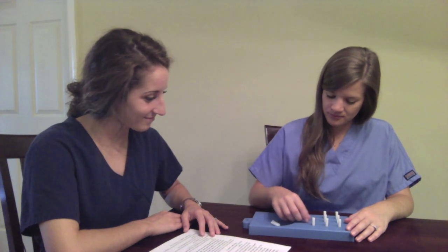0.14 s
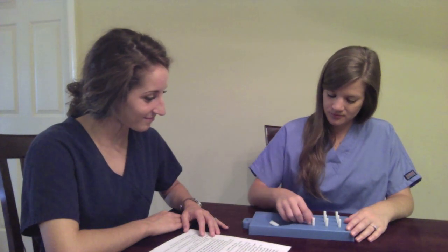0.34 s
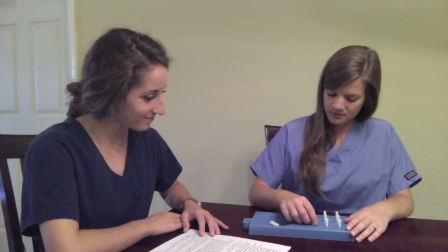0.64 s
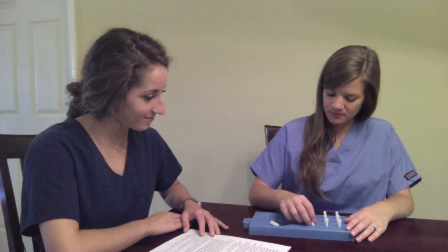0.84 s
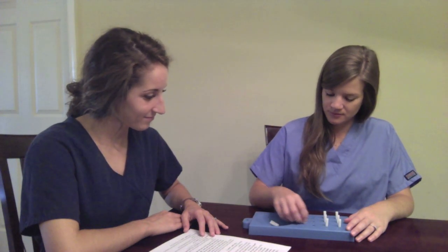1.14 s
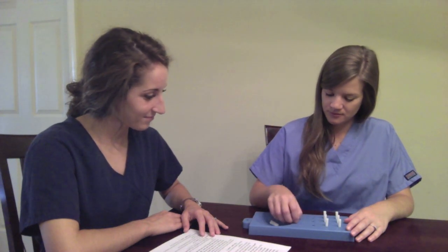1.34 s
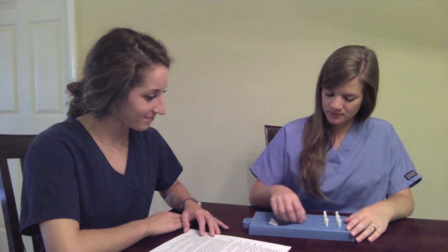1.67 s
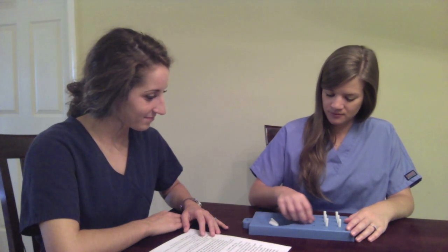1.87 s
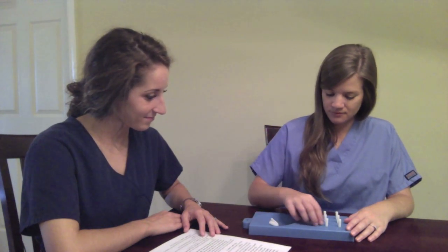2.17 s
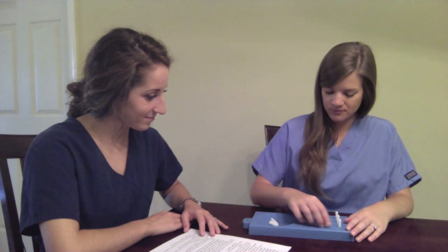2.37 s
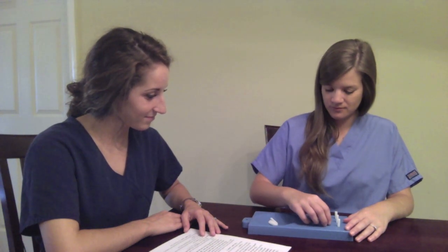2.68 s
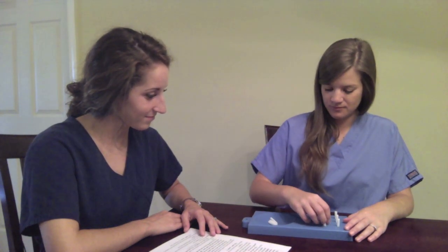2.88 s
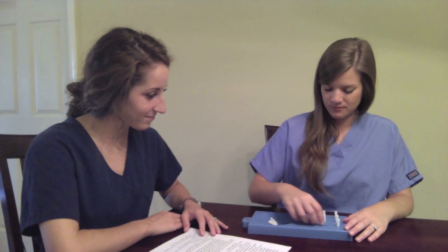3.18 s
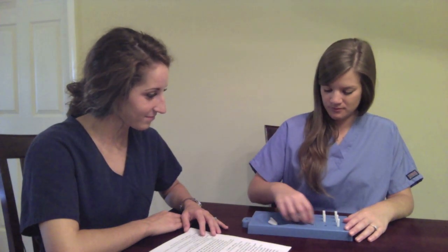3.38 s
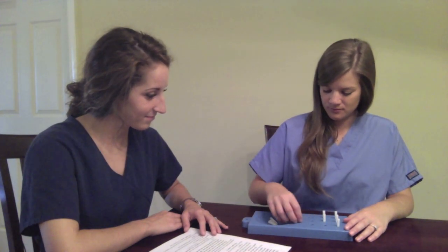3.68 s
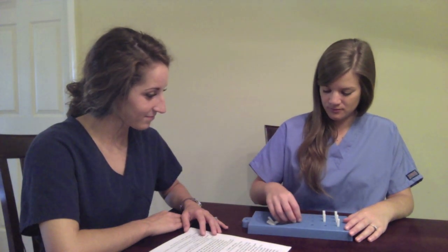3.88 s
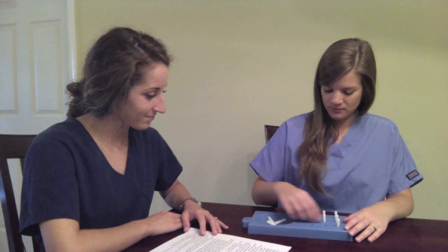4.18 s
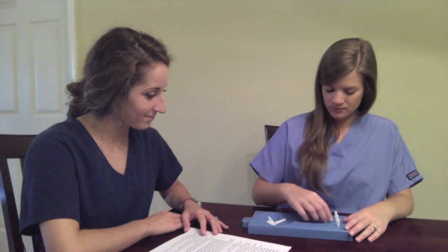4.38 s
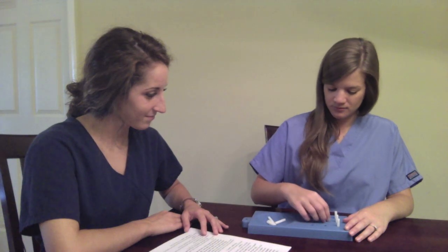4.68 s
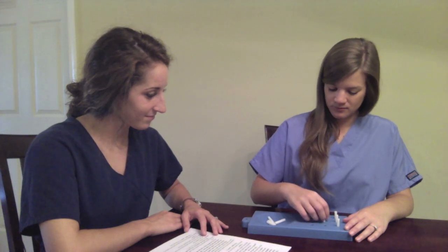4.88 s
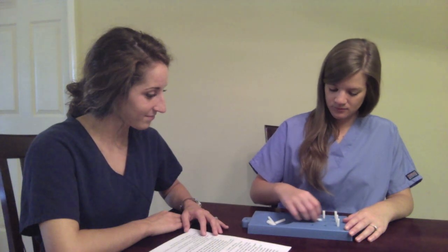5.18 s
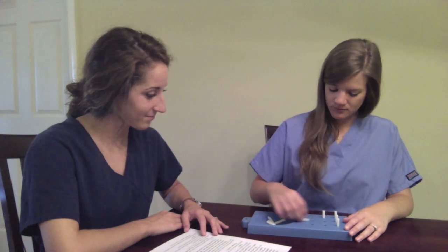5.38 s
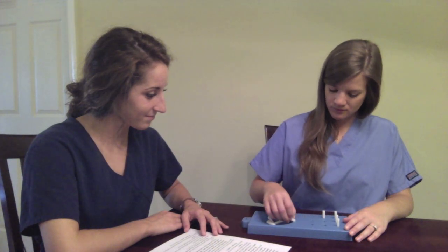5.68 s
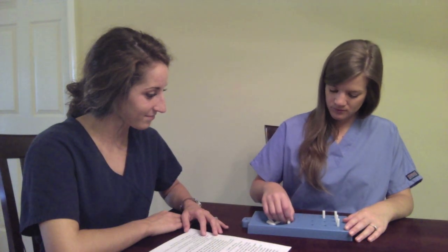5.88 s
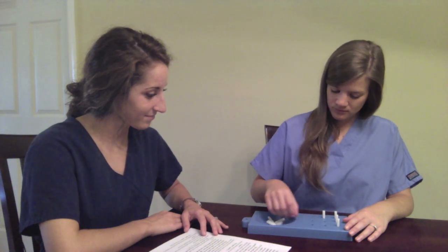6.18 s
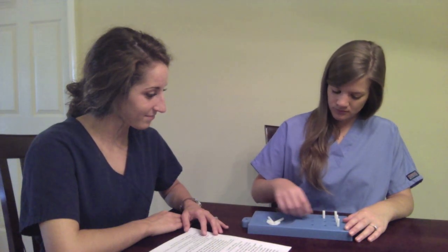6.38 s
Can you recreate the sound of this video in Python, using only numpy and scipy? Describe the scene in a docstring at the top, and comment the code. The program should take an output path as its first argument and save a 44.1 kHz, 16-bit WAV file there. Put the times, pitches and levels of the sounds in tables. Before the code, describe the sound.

Quiet indoor air with fingers softly bumping a plastic board. A peg clicks, then clatters into a hollow tray; light ticks follow, and another peg lands with a harder, fuller rattle. A low soft thump, a pause, a short gritty scrape of pegs over plastic, then two quieter drops with brief chatter. Dry, close-sounding clicks with a short room tail, in mono, from a microphone about a table's distance away.

```python
"""Small plastic pegs are pulled from a pegboard and dropped into its hollow tray, in a quiet room.
Some chatter, loose in the tray or wiggled in a hole; fingers tick pegs, bump the board and drag pegs.
Each contact is a blow of noise and echoes, filtered by the resonances of board and peg.
Drags are random stick-slip clicks through the tray; the room tone is shaped noise."""
import sys
import numpy as np
from scipy import signal
from scipy.fft import rfft, irfft
from scipy.io import wavfile

SR = 44100
rng = np.random.default_rng(int(sys.argv[2]) if len(sys.argv) > 2 else 0)


def int16_out(signal):
    """Quantize to a 16-bit WAV file."""
    q = np.round(np.clip(np.atleast_2d(signal).T, -1, 1) * 32767)
    wavfile.write(sys.argv[1], SR, q.astype(np.int16))


N = 287954

# Parts of a contact's sound: thud, shell, clack, click, fizz. Each row: low edge in Hz, high edge in Hz.
PARTS_HZ = [(250, 500), (600, 2000), (2200, 5000), (5500, 8000), (9500, 15000)]
# Soft finger bumps on the board. Each row: start in seconds, level in dB, hardness as a corner in Hz.
BUMPS = [(0.249, -56.5, 382), (0.424, -65, 1390), (0.458, -59.5, 1510), (0.744, -62, 800),
         (2.85, -63.5, 900), (3.219, -58, 900), (4.134, -46, 363), (4.17, -48, 348), (4.206, -56, 372),
         (4.496, -61, 447), (4.538, -64, 793), (6.444, -53.5, 400)]
# Broad colour of a knock. Each row: frequency in Hz, relative level in dB per Hz.
KNOCK_COLOUR = [(30, -46), (70, -33), (150, -26.5), (240, -19.5), (320, -3.5), (470, -7), (700, -4),
                (1400, -6), (2000, -7.5), (2600, -5), (3600, -1), (5000, -9.5), (7500, -17), (8600, -23),
                (11000, -16), (16000, -26.5)]
# Broad colour of a scrape. Each row: frequency in Hz, relative level in dB per Hz.
SCRAPE_COLOUR = [(40, -26), (200, -18), (330, -5), (480, -6), (700, -3), (1800, 7.5), (2600, -6.5),
                 (4200, -4.5), (5200, -27), (9000, -35), (16000, -43)]
# Resonances of the board and tray, plus the long narrow ring of a peg still ringing near 3.4 kHz. Each row:
# frequency in Hz, width in Hz, lift in dB.
BOARD_AND_PEG_MODES = [(301, 24, 8.5), (389, 34, 9), (584, 19, 10), (720, 13, 5.5), (820, 70, 3), (994, 59, 5.5),
                       (1327.4, 30, 9), (1713, 64, 5.5), (2133, 17, 9.5), (2390, 8.3, 7), (2486, 35, 9.5),
                       (2616, 50, 7), (2720, 45, 4.5), (2800, 21, 6.5), (2997, 63, 5.5), (3130, 32, 2),
                       (3370, 13, 9.5), (3413, 6.4, 7), (3450, 12, 4), (3620, 25, 4), (3970, 40, 5.5),
                       (4610, 39, 9.5), (5796, 150, 5)]
# Room decay. Each row: frequency in Hz, time to fall 60 dB in seconds.
ROOM_T60 = [(100, .45), (330, 0.31), (700, 0.21), (1700, 0.29), (3400, 0.25), (6000, 0.28), (12000, 0.17),
            (16000, 0.21)]
# Colour of the room tone. Each row: frequency in Hz, relative level in dB per Hz.
AIR_COLOUR = [(15, -69), (25, -40.5), (48, -11.5), (166, -7.5), (242, -4), (277, -4), (384, -4.5),
              (439, -8.5), (695, -3), (775, -8.5), (2280, -8.5), (2840, -19), (3520, -16), (4870, -25),
              (16000, -32)]
# Drift of the room tone. Each row: time in seconds, level in dB before the overall gain.
AIR_DRIFT = [(0, -65), (.4, -69), (.9, -68.5), (1.6, -62.5), (2.2, -66.5), (3.4, -68), (4, -64.5),
             (4.75, -70.5), (5.151, -71), (5.7, -65.5), (6.53, -65.5)]
# Light touches on a held peg. Each row: start in seconds, lower mode in Hz, its level in dB,
# upper mode's level in dB relative to the lower.
PINGS = [(.47, 2070, -60, -22), (0.5255, 2150, -54.5, 3), (0.9405, 2670, -52.5, -28),
         (1.097, 2420, -53.5, -7), (1.158, 2654, -53, -16), (1.8554, 2220, -44.5, -12),
         (2.24, 2820, -45, -10.5), (2.3755, 2800, -53, -4.5), (2.438, 2940, -61.5, -11),
         (3.077, 2550, -61.5, -16.5), (3.22, 1670, -56.5, -22), (3.229, 1795, -52.5, -24),
         (3.4915, 2420, -45.5, 1), (4.537, 2440, -61.5, -9.5), (5.193, 2620, -57.5, -5),
         (5.458, 3740, -59.5, -0.5), (5.56, 2390, -53, -5), (6.0921, 2570, -51, -7)]
# Pegs striking board or peg. Each row: start in seconds, peg pitch in Hz, clack level in dB,
# board's share in dB relative to the clack, sharp edge's share likewise.
STRIKES = [(0.524, 2350, -50.5, -9.5, -18.5), (0.981, 2320, -31, -3.5, -7.5), (1.158, 2620, -50.5, -3, -33),
           (1.312, 3240, -25.5, -4, -8.5), (1.321, 2580, -32, -5.5, -9), (1.361, 2670, -31, -1, -14),
           (1.394, 3300, -32, -7, -11.5), (1.423, 2670, -36, -1, -11), (1.445, 3400, -28, -13, -10),
           (1.476, 2770, -37, -5.5, -12.5), (1.493, 3690, -35.5, -13, -5.5),
           (1.854, 2100, -51.5, -10.5, -14.5), (1.864, 2240, -43, -8, -9), (2.239, 2090, -48, 1.5, -20),
           (2.314, 2450, -52, 7, -26), (3.123, 2390, -57, -3, -35), (3.491, 2400, -37, -10.5, -18.5),
           (3.516, 2570, -45, -2, -10.5), (3.523, 2650, -26, 1, -12), (3.532, 2400, -35, 6, -16.5),
           (3.551, 2580, -29, -9.5, -10.5), (3.593, 2560, -33.5, 2.5, -3.5),
           (3.602, 2560, -24.5, -10.5, -12), (3.636, 2840, -32.5, -3, -12.5),
           (3.656, 3390, -31.5, -4, -15.5), (3.674, 3000, -27.5, -8.5, -13.5), (3.71, 3360, -33, -8.5, -13),
           (3.736, 3350, -31, -8.5, -14), (5.263, 2540, -47.5, -4, -30), (5.358, 2830, -38.5, 1, -15),
           (5.813, 2560, -35.5, -2, -13), (5.822, 2600, -36.5, -2.5, -22), (6.092, 2660, -46.5, 3, -22),
           (6.144, 3520, -41, -4, -11), (6.211, 3440, -36, -8, -13)]
# Pegs chattering, loose in the tray or wiggled in a hole. Each row: start in seconds, length in seconds,
# number of bounces, first clack level in dB before scatter, mean board share in dB,
# mean sharp edge share in dB.
RATTLES = [(1.177, 0.053, 4, -65.5, 17, -27), (1.34, 0.22, 16, -36, -8.5, -14.5),
           (3.611, 0.17, 13, -32.5, -7, -13), (5.225, .235, 9, -52.5, 2, -27),
           (6.101, 0.15, 13, -41, -5.5, -20)]
# Pegs dragged over the tray. Each row: start in seconds, length in seconds, peak level in dB.
DRAGS = [(5.181, 0.3, -39.5), (5.787, 0.042, -50.5)]

BAND_LIMIT_HZ = 16000
SIZE = 16384  # samples in one contact
HZ = np.fft.rfftfreq(SIZE, 1 / SR)
AGE_S = np.arange(SIZE) / SR
UPPER_MODE_HZ = 4300
GAP_SHRINK, GAP_SCATTER = 0.97, 0.25  # mean ratio of successive gaps; log spread
BOUNCE_SCATTER_DB, FADE_DB = 2.5, -4.5  # random strength; mean change from first bounce to last
FIRST_NOTE_HZ, LAST_NOTE_HZ = 2660, 3500  # mean peg note, first bounce and last
THUD_DB = -12  # thud relative to shell
FIZZ_SLOPE, FIZZ_DB = 1.566, 2  # fizz follows a sharp edge faster than the click does
DRAG_SKEW, DRAG_ARCH = 1.34, 0.53  # a stroke swells slowly and stops sooner


def amp(db):
    """Decibels to gain."""
    return 10 ** (np.asarray(db) / 20)


def evened(x):
    """Scales to rms 1."""
    return x / np.sqrt(np.mean(x ** 2) + 1e-20)


def read(points, hz):
    """Joins (Hz, value) points on a log-frequency axis."""
    point_hz, value = np.transpose(points)
    return np.interp(np.log(hz + 1), np.log(point_hz + 1), value)


def add(mix, start_s, sound):
    """Mixes a sound in at start_s."""
    part = mix[round(start_s * SR):][:len(sound)]
    part += sound[:len(part)]


def causal(db):
    """Minimum-phase response with this gain: it rings only after it is struck."""
    log_gain = np.log(amp(np.concatenate([db, db[-2:0:-1]])))
    return np.exp(np.conj(signal.hilbert(log_gain)))[:len(db)]


def lift(hz, width_hz, db):
    """One resonance as a bump in dB."""
    return 10 * np.log10(1 + (amp(db) ** 2 - 1) / (1 + (2 * (HZ - hz) / width_hz) ** 2))


def level_db(spectrum):
    """Level of a blow whose energy is spread over 20 ms."""
    energy = 2 * np.sum(abs(spectrum) ** 2) / SIZE
    return 10 * np.log10(energy / (.02 * SR) + 1e-20)


def board_db():
    """All resonances of the hollow board, with the lingering ring of a peg near 3.4 kHz."""
    return sum(lift(*mode) for mode in BOARD_AND_PEG_MODES)


def room_tail(rise_s):
    """Unit-energy spectrum of the room's tail: noise decaying at each frequency's own rate."""
    hz, t, z = signal.stft(rng.standard_normal(SIZE), SR, nperseg=256)
    decay = 1e-3 ** (t / read(ROOM_T60, hz)[:, None])
    tail = signal.istft(z * decay, SR, nperseg=256)[1][:SIZE]
    tail *= 1 - np.exp(-AGE_S / rise_s)
    return rfft(tail / np.linalg.norm(tail))


def blow(chatter_s=.0026, chatter_db=6, wall_s=.0112, wall_db=-9, room_db=6.5, room_rise_s=0.0023):
    """Spectrum of one blow: a snap with a few ms of chatter, an echo off the near wall, the room's tail."""
    sparse = rng.standard_normal((2, SIZE)) * (rng.random((2, SIZE)) < .2)
    chatter = sparse * np.exp(-AGE_S / (2 * chatter_s))
    chatter /= np.linalg.norm(chatter, axis=1, keepdims=True)
    direct, echo = amp(chatter_db) * rfft(chatter)
    echo = amp(wall_db) * (1 + echo) * np.exp(-2j * np.pi * HZ * wall_s)
    return 1 + direct + echo + amp(room_db) * room_tail(room_rise_s)


def room_tone(gain_db=1):
    """Faint air noise of fixed colour whose level drifts."""
    colour = amp(read(AIR_COLOUR, np.fft.rfftfreq(N, 1 / SR)))
    air = irfft(rfft(rng.standard_normal(N)) * colour, N)
    drift_db = np.interp(np.arange(N) / SR, *np.transpose(AIR_DRIFT))
    return evened(air) * amp(gain_db + drift_db)


def fingers(low_hz=270, dry_db=2):
    """A soft fingertip drives the board's lower modes; its hardness sets how far up they reach."""
    out = np.zeros(N)
    body_db = read(KNOCK_COLOUR, HZ) + board_db()
    for start_s, db, corner_hz in BUMPS:
        treble_loss = 1 + (HZ / corner_hz) ** 6
        bass_loss = 1 + (low_hz / (HZ + 20)) ** 4
        soft_db = np.maximum(-10 * np.log10(treble_loss * bass_loss), -70)
        hit = (blow() + amp(dry_db)) * causal(body_db + soft_db)
        add(out, start_s, irfft(hit * amp(db - level_db(hit))))
    return out


def pings(width_hz=270, dry_db=5):
    """A light touch on a held peg sounds two short modes and little else."""
    out = np.zeros(N)
    for start_s, pitch_hz, low_db, upper_db in PINGS:
        for hz, db in ((pitch_hz, low_db), (UPPER_MODE_HZ, low_db + upper_db)):
            ring = (blow() + amp(dry_db)) / (1 + 2j * (HZ - hz) / width_hz) ** 2
            add(out, start_s, irfft(ring * amp(db - level_db(ring))))
    return out


def contact(pitch_hz, db, board_share_db, edge_db, ring_width_hz=110, ring_db=5,
            soft_db=-36, purity=0.93, sharp_db=-46, dulling=0.19):
    """One contact rings board and peg; a lighter touch has a purer peg note and a duller top."""
    fizz_db = FIZZ_SLOPE * edge_db + FIZZ_DB
    parts_db = db + np.array([board_share_db + THUD_DB, board_share_db, 0, edge_db, fizz_db])
    bands = [(HZ > lo) & (HZ < hi) for lo, hi in PARTS_HZ]
    # two points inside each band hold its weight
    spans_hz = np.ravel([np.geomspace(lo, hi, 6)[[1, -2]] for lo, hi in PARTS_HZ])
    note_db = ring_db + np.clip(purity * (soft_db - db), 0, 10)
    top = np.clip((HZ - 11000) / 3000, 0, 1.5)
    dull_db = top * np.clip(dulling * (sharp_db - parts_db[4]), 0, 12)
    peg_db = lift(pitch_hz, ring_width_hz, note_db)
    hit = blow() * causal(read(KNOCK_COLOUR, HZ) + board_db() + peg_db - dull_db)
    for _ in range(2):  # steer each part towards its level, twice as the bands interact
        weights_db = [part_db - level_db(hit[band]) for part_db, band in zip(parts_db, bands)]
        hit = hit * causal(read(np.c_[spans_hz, np.repeat(weights_db, 2)], HZ))
    return irfft(hit)


def pegs():
    """Distinct strikes of pegs pulled, dropped and nudged, each a contact ringing peg and board."""
    out = np.zeros(N)
    for start_s, *touch in STRIKES:
        add(out, start_s, contact(*touch))
    return out


def rattles(pitch_scatter=0.076, colour_scatter_db=3):
    """Uneven bounces tend to come faster, weaker and higher as a peg's chatter runs on."""
    out = np.zeros(N)
    for start_s, length_s, bounces, db, board_share_db, edge_db in RATTLES:
        chance = rng.standard_normal((round(bounces), 5))
        gaps = GAP_SHRINK ** np.arange(len(chance)) * np.exp(GAP_SCATTER * chance[:, 0])
        progress = (np.cumsum(gaps) - gaps) / np.sum(gaps[:-1])
        for u, (note, force, spot, angle) in zip(progress, chance[:, 1:]):
            mean_hz = FIRST_NOTE_HZ + u * (LAST_NOTE_HZ - FIRST_NOTE_HZ)
            pitch_hz = mean_hz * (1 + pitch_scatter * note)
            strength_db = db + FADE_DB * u + BOUNCE_SCATTER_DB * force
            bounce = contact(pitch_hz, strength_db, board_share_db + colour_scatter_db * spot,
                             edge_db + colour_scatter_db * angle)
            add(out, start_s + u * length_s, bounce)
    return out


def drag(slips_per_s=380, spread_db=5):
    """Sliding pegs stick and slip in tiny clicks that ring the tray."""
    when = rng.random(N) < slips_per_s / SR
    slips = when * rng.choice([-1, 1], N) * amp(spread_db * rng.standard_normal(N))
    stroke = np.zeros(N)
    for start_s, length_s, db in DRAGS:
        u = np.linspace(0, 1, round(length_s * SR))
        add(stroke, start_s, amp(db) * abs(np.sin(np.pi * u ** DRAG_SKEW)) ** DRAG_ARCH)
    tray = irfft((blow() + 1) * causal(read(SCRAPE_COLOUR, HZ) + board_db()))
    return signal.oaconvolve(evened(slips) * stroke, tray / np.linalg.norm(tray))[:N]


def scene():
    """Sum of room, fingers and pegs, as one channel."""
    return (room_tone() + fingers() + pings() + pegs() + rattles() + drag())[None]


def record(dry):
    """The recorder's band limit: a linear-phase low-pass."""
    low_pass = signal.firwin(511, BAND_LIMIT_HZ, window=("kaiser", 9), fs=SR)
    return signal.oaconvolve(dry, low_pass[None], "same")


dry = scene()
out = record(dry)
int16_out(out)
```